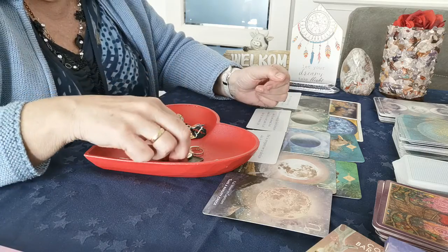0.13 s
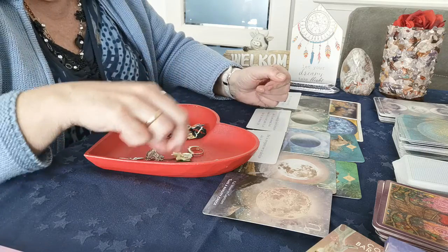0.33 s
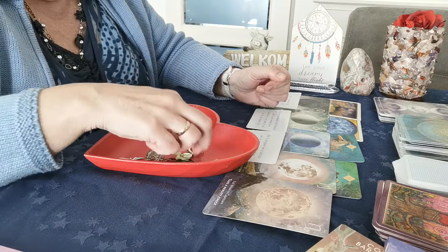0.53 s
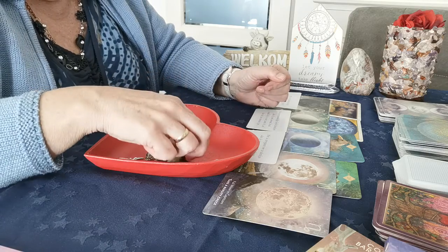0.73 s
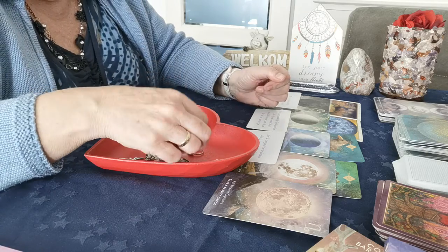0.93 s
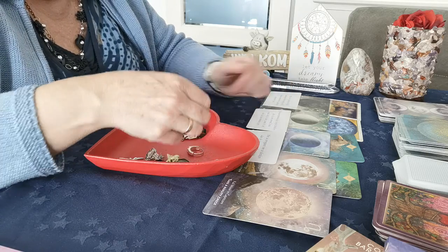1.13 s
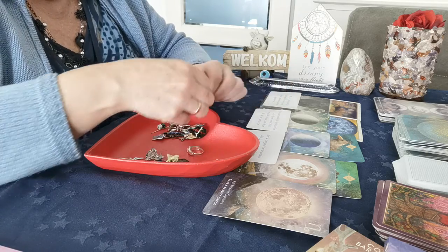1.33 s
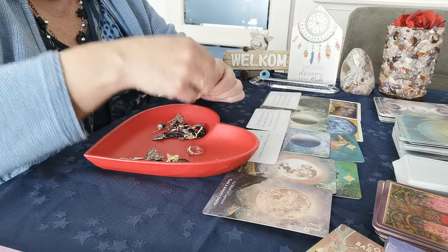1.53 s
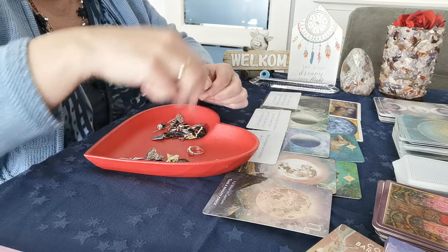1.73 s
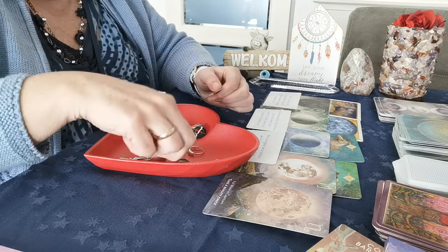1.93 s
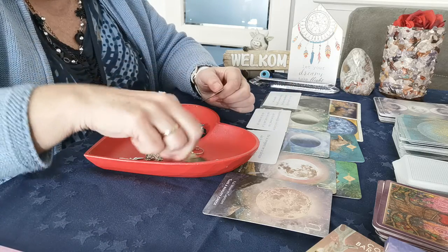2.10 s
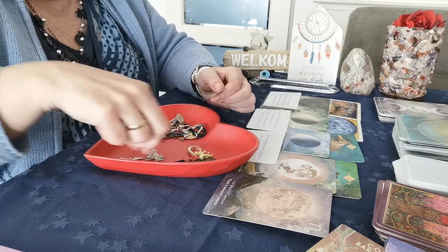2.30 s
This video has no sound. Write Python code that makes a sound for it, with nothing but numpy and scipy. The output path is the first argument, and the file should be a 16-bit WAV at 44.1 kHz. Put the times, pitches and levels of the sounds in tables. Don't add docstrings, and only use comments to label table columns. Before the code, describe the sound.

Close up in a quiet indoor room, fingers push metal trinkets around a hard plastic dish: dry knocks, skids and thin clinks, a near-silent gap with soft cloth rustle, then a sharp final rattle.

```python
import sys
import numpy as np
from scipy import signal
from scipy.fft import rfft, irfft
from scipy.io import wavfile
from scipy.ndimage import uniform_filter1d

SR = 44100
rng = np.random.default_rng(int(sys.argv[2]) if len(sys.argv) > 2 else 0)


def makeup_ratio(level_db):
    decades = np.asarray(level_db, float) / 20
    return 10 ** decades


def waveform_to_disk(signal):
    frames = np.transpose(np.atleast_2d(signal))
    scaled = np.clip(frames, -1, 1) * 32767
    samples = np.round(scaled).astype(np.int16)
    wavfile.write(sys.argv[1], SR, samples)


N = 104164

# (frequency [Hz], level [dB per Hz])
DISH_SPECTRUM = [(300, -12), (760, -13), (950, -5.5), (1400, -3), (2300, -3), (3100, -1), (3700, -1.5),
                 (8000, -26), (15000, -67)]
# (frequency [Hz], level [dB per Hz])
JINGLE_SPECTRUM = [(2500, -24), (4000, -3.5), (5000, -7), (5800, 0.5), (6500, -4.5), (7900, -0.5),
                   (10400, -21), (14800, -19), (16200, -40)]
# (frequency [Hz], level [dB], t60 [s])
CHARM_MODES = [(5730, -4, .05), (5916, -7, .06), (6630, -10, .06), (7250, -8, .06), (7800, -3, .05),
               (8050, -6, .06), (9100, -14, .06), (10190, -22, .08), (12650, -22, .07)]


def evened(x):
    return x / np.sqrt(np.mean(x ** 2) + 1e-20)


def read(points, hz):
    f, value = np.transpose(points)
    return np.interp(np.log(hz + 1), np.log(f + 1), value)


def add(mix, s, sound):
    part = mix[max(round(s * SR), 0):][:len(sound)]
    part += sound[:len(part)]


def click(points):
    hz = abs(np.fft.fftfreq(2048, 1 / SR))
    log_gain = np.log(makeup_ratio(np.maximum(read(points, hz), -100)))
    minimum_phase = np.exp(signal.hilbert(log_gain).conj())
    taps = np.fft.ifft(minimum_phase).real[:1024]
    return taps / np.linalg.norm(taps)


def resonate(x, hz, width):
    turn = np.exp(2j * np.pi * hz * np.arange(x.shape[-1]) / SR)
    r = np.exp(-np.pi * width / SR)
    return 2 * (turn * signal.lfilter([1 - r], [1, -r], x / turn)).real


def ring(hz, db, t60, size=9000):
    t = np.arange(size) / SR
    return makeup_ratio(db - 60 * t / t60) * np.sin(2 * np.pi * hz * t)


def grains(per_s, spread_db):
    hit = rng.random(N) < per_s / SR
    size = makeup_ratio(spread_db * np.minimum(rng.exponential(1, N), 3))
    x = hit * rng.choice([-1., 1.], N) * size
    return x / np.sqrt(uniform_filter1d(x ** 2, size=500) + 0.44 * np.mean(x ** 2))


def floor():
    # (frequency [Hz], level [dB per Hz])
    air_spectrum = [(12, -44), (22, -15.5), (44, -12), (77, -9.5), (301, -17), (399, -17), (718, -22.5),
                    (2750, -28), (16000, -49.5)]
    # (frequency [Hz], left-right coherence [-1 to 1])
    coherence = [(60, 0.093), (240, 0.58), (950, -0.17), (3770, 0.13), (15000, -0.15)]
    air_db, hum_db, hum_hz = -68.5, -72, 49.96
    frames, hz = N // 512 + 5, np.fft.rfftfreq(2048, 1 / SR)
    a, b, c, d = rng.standard_normal((frames, 1025, 4)).T
    same = np.clip(read(coherence, hz), -1, 1)[:, None]
    left, other = a + 1j * b, c + 1j * d
    right = same * left + np.sqrt(1 - same ** 2) * other
    z = np.array([left, right]) * makeup_ratio(read(air_spectrum, hz)[:, None])
    air = evened(signal.istft(z, nperseg=2048, noverlap=1536)[1][:, :N])
    hum = resonate(rng.standard_normal(N), hum_hz, 6.9)
    hum = evened(resonate(hum, hum_hz, 4.3))
    return makeup_ratio(air_db) * air + makeup_ratio(hum_db) * hum


def sleeve():
    # (time [s], level [dB])
    rubbing = [
        (1.26, -77.5),
        (1.5, -64),
        (1.594, -70),
        (1.938, -85),
        (1.954, -110),
        (1.983, -87),
        (2.0, -98),
    ]
    # (frequency [Hz], level [dB per Hz])
    rustle_spectrum = [(300, -29), (700, -5.5), (2400, -11.5), (8000, -18.5), (12000, -31)]
    rub_hz, width_hz, rustle_db = 284, 90, -7
    s, db = np.transpose(rubbing)
    rub = resonate(grains(405.6, 7.9), rub_hz, width_hz)
    rub = resonate(rub, rub_hz, 2 * width_hz)
    rustle = signal.oaconvolve(grains(4800, 2.2), click(rustle_spectrum))[:N]
    strength = makeup_ratio(np.interp(np.arange(N) / SR, s, db, -120, -120))
    return (evened(rub) + makeup_ratio(rustle_db) * rustle) * strength


def thuds():
    # (time [s], peak level [dB], frequency [Hz], t60 [s])
    bumps = [(0.249, -57, 126.5, 0.19), (0.304, -65.5, 368, 0.3), (0.419, -49.5, 379, 0.19),
             (0.426, -58, 121, 0.11), (0.791, -66, 120, 0.25), (1.08, -58, 120.7, 0.35),
             (1.227, -59, 121, 0.13), (2.115, -59, 409, 0.12), (2.236, -51, 246, 0.041),
             (2.29, -52.5, 135, 0.136), (2.333, -52.5, 206, 0.1)]
    rise_s = 0.0066
    out, t = np.zeros(N), np.arange(9000) / SR
    for (s, db, hz, t60), shake in zip(bumps, rng.standard_normal((20, 9000))):
        shudder = evened(resonate(shake, hz, 0.15 * hz)) * makeup_ratio(db + 5 - 60 * t / t60)
        add(out, s, (ring(hz, db, t60) + shudder * 0.38) * np.minimum(t / rise_s, 1))
    return out


def tinks():
    # (time [s], peak level [dB], frequency [Hz], t60 [s])
    ringing = [(.303, -57, 5600, 0.022), (.362, -25, 4030, 0.011), (.7525, -37.5, 2166, .035),
               (.7765, -44, 2090, 0.024), (.785, -46.5, 2103, .03), (.934, -32.5, 5854, 0.026),
               (.934, -54, 8300, 0.022), (.934, -52, 12750, 0.032), (1.226, -47, 5910, 0.1),
               (1.225, -60, 8260, 0.22), (1.228, -43.5, 1232, 0.04), (1.226, -44, 6600, 0.039),
               (1.228, -44, 1940, .03), (1.232, -44, 2740, 0.037), (1.612, -71, 2370, 0.11),
               (1.226, -60, 11200, .12), (1.226, -58, 13300, .12), (1.226, -60, 14600, .09),
               (1.055, -58, 14200, .06), (.934, -58, 10900, .07), (1.226, -52, 7400, .08),
               (.7455, -56, 2200, .02), (2.263, -35.5, 5900, 0.017), (2.263, -36, 4200, .012)]
    rise_cycles = 4.5
    out, t = np.zeros(N), np.arange(9000) / SR
    for s, db, hz, t60 in ringing:
        add(out, s, ring(hz, db, t60) * np.minimum(t * hz / rise_cycles, 1))
    return out


def stirring():
    # (time [s], effort [dB], metal share [dB])
    strokes = [
        [(0, -39.5, -11.5), (.03, -48.5, -8), (.055, -49.5, -18.5), (.1, -58.5, -15)],
        [(.234, -48, 2), (.25, -42.5, -4.5), (.268, -44.5, -9), (.285, -55.5, -18), (.35, -46, -6.5),
         (.41, -36, -10.5), (.47, -51.5, -16), (.6, -50, -18), (.64, -68, -11)],
        [(.772, -59, -10.5), (.8, -55.5, 2.5), (.84, -59.5, -10.5), (.9, -48, -9.5), (.965, -60, -8),
         (1.018, -64, -1), (1.03, -53, -8), (1.095, -51, -2), (1.17, -88, -31)],
        [(1.228, -51, -30), (1.256, -61, -2), (1.3, -80.5, 9)],
        [(2.112, -61.5, -11), (2.14, -72, -4.5), (2.205, -82, 0), (2.22, -54, -17), (2.245, -39.5, -14),
         (2.3, -44, -5.5), (2.335, -42, -6), (2.36, -52, -1.5)],
    ]
    stroke_tilts = [4, -2, 1.5, 0, -1]
    # (frequency [Hz], level [dB per Hz])
    drum_spectrum = [(60, -11), (120, 8), (370, 4), (800, 1)]
    skid_db, drum_db, clink_db, clink_ring_db = -2, -29, 5.5, -23.5
    skid_t60, spots = 0.008, 16
    t, effort, metal, tilt_db = np.arange(N) / SR, np.zeros(N), np.zeros(N), np.zeros(N)
    for rows, tilt in zip(strokes, stroke_tilts):
        s, db, rel_db = np.transpose(rows)
        edge = np.clip(np.minimum(t - s[0] + .002, s[-1] + .01 - t) / .004, 0, 1)
        effort += edge * makeup_ratio(np.interp(t, s, db))
        tilt_db += edge * tilt
        metal += edge * makeup_ratio(np.interp(t, s, db + rel_db))

    slips = effort * grains(2600, 3.5)
    spot, skids = rng.integers(0, spots, N), np.zeros(N)
    for k, hz in enumerate(np.geomspace(950, 3250, spots)):
        note = ring(hz, 0, skid_t60, size=800)
        here = slips * (spot == k) * makeup_ratio(tilt_db * np.log2(hz / 1800))
        skids += signal.oaconvolve(here, note / np.linalg.norm(note))[:N]

    clinks = metal * grains(3000, 3.5)
    which = rng.integers(0, len(CHARM_MODES), N)
    out = makeup_ratio(skid_db) * signal.oaconvolve(skids + .5 * slips, click(DISH_SPECTRUM))[:N] * .5
    out += makeup_ratio(drum_db) * signal.oaconvolve(slips, click(drum_spectrum + [(2000, -76)]))[:N]
    out += makeup_ratio(clink_db) * signal.oaconvolve(clinks, click(JINGLE_SPECTRUM))[:N]
    for k, (hz, db, t60) in enumerate(CHARM_MODES):
        mode = ring(hz, db, t60) / np.sqrt(t60 * SR / 28 / len(CHARM_MODES))
        out += makeup_ratio(clink_ring_db) * signal.oaconvolve(clinks * (which == k), mode)[:N]
    return out


def knocks():
    # (time [s], peak level [dB], dish note [Hz], metal share [dB])
    dish_knocks = [(0.0263, -31.5, 3130, -13), (0.245, -26.5, 2840, -35), (0.2627, -28, 2350, -2.5),
                   (0.303, -29.5, 2430, -2), (0.3614, -15, 2670, -13.5), (0.5247, -31.5, 2390, -17),
                   (0.5625, -33.5, 2400, -10), (0.5941, -31.5, 2210, -25), (0.753, -49, 2100, -2.5),
                   (0.776, -32, 2130, -10), (0.7851, -35, 2240, -4.5), (0.9022, -33, 3010, -7.5),
                   (0.935, -42, 2580, 8), (1.0292, -42, 2160, -32), (1.054, -34, 2490, 0),
                   (1.08, -31, 2480, -25), (1.088, -35, 3000, -23), (1.226, -36, 2000, -1),
                   (1.2354, -34, 2630, -4.5),
                   (2.115, -56, 1400, -22), (2.193, -55, 2440, 6.5), (2.217, -33.5, 2820, -12),
                   (2.223, -36, 2360, -27), (2.238, -28, 2130, -9), (2.2632, -23.5, 2470, 0.5),
                   (2.277, -21.5, 2230, -10.5), (2.287, -14, 1786, -38), (2.2952, -21, 2040, -11),
                   (2.3073, -20, 2240, -14.5), (2.316, -25, 2250, -13), (2.329, -27.5, 2330, -4),
                   (0.0048, -48, 2430, -27), (0.0132, -23, 2500, -28), (0.0359, -30, 2070, -37),
                  (0.239, -30, 2340, -7), (0.2481, -20.5, 2660, -13), (0.265, -34, 2220, -11),
                  (0.3055, -32.5, 2040, -20), (0.3273, -33.5, 2360, -4), (0.3509, -29.5, 2160, -22),
                  (0.3697, -31, 2780, -20), (0.3972, -30, 2420, -15), (0.4048, -29.5, 1700, -7.5),
                  (0.409, -26, 2200, -10), (0.4147, -33, 2270, -25), (0.4211, -28, 2420, -21),
                  (0.4398, -25.5, 1980, -10), (0.4502, -32.5, 1580, -20), (0.454, -36, 2420, -14),
                  (0.477, -34, 1720, -18), (0.4887, -38, 2230, -14), (0.5089, -39, 1870, -12),
                  (0.5348, -42, 1945, -23), (0.5681, -45, 1790, -4), (0.5833, -58, 2530, -23),
                  (0.6023, -39, 1890, -12), (0.615, -45.5, 2080, -20), (0.7936, -43, 2380, -3),
                  (0.7977, -41, 2430, 0), (0.8056, -36.5, 3320, -3), (0.8559, -42, 2500, -6),
                  (0.8707, -39, 1600, -22), (0.899, -30, 2160, -19), (0.9071, -48, 2660, -4),
                  (0.9641, -37, 2080, -7), (1.102, -51, 2690, -7), (1.1386, -40, 2530, -15),
                  (2.234, -37, 2540, -11), (2.2511, -28.5, 1720, -19), (2.2725, -27, 2380, -10),
                  (2.3035, -21.5, 2190, -25), (2.3316, -27.5, 2330, -15), (2.3529, -39, 2410, -14)]
    note_db, low_note_db, blow_db, crack_db, tick_db, ring_db = -4.5, -16, -18, -7.5, 3, -20.5
    note_t60, burst_t60, rise_s = 0.0071, 0.011, 0.00096
    low_note_hz = 1302
    out, crack, tick = np.zeros(N), click(DISH_SPECTRUM), click(JINGLE_SPECTRUM)
    t = np.arange(800) / SR
    rise = np.sin(np.pi / 2 * np.minimum(t / rise_s, 1)) ** 2
    events = dish_knocks
    for (s, db, hz, metal_db), luck in zip(events, rng.standard_normal((90, 830))):
        note = ring(hz, db + note_db, note_t60, size=800)
        low = ring(low_note_hz * (1 + 0.083 * luck[28]), db + low_note_db, 2 * note_t60, size=800)
        add(out, s, (note + low) * rise * 2)
        add(out, s + rise_s / 2, makeup_ratio(db + blow_db) * crack / abs(crack).max())

        burst = luck[30:] * makeup_ratio(-60 * t / burst_t60) * np.sqrt(rise)
        chatter, rattle = np.convolve(crack, burst), np.convolve(tick, burst)
        add(out, s, makeup_ratio(db + crack_db) * chatter / abs(chatter).max())
        add(out, s, makeup_ratio(db + metal_db + tick_db) * rattle / abs(rattle).max())

        for (f, mode_db, t60), detune, gain in zip(CHARM_MODES, luck, luck[15:]):
            mode = ring(f * (1 + .015 * detune), mode_db + 3 * gain, t60)
            add(out, s, makeup_ratio(db + metal_db + ring_db) * mode)
    return out


def room(x):
    # (frequency [Hz], t60 [s])
    decay = [(200, 0.6), (700, 0.48), (1800, 0.38), (4600, 0.53), (10000, 0.22)]
    room_db = -5
    taps = np.zeros((2, SR // 2))
    at = np.arange(120, SR // 2 - 20, 20)
    at = at + rng.integers(0, 20, (2, len(at)))
    np.put_along_axis(taps, at, rng.choice([-1., 1.], at.shape), 1)
    hz, t, z = signal.stft(taps, SR, nperseg=256)
    z = z * makeup_ratio(-60 * t / read(decay, hz)[:, None])
    tail = signal.istft(z, SR, nperseg=256)[1]
    tail = makeup_ratio(room_db) * tail / np.linalg.norm(tail[0])
    return signal.fftconvolve(x[None], tail, axes=1)[:, :N]


def near(x):
    near_db, edge_hz, turns_per_s = -4, 3000, 9
    t, out = np.arange(N) / SR, np.zeros(N)
    paths = rng.standard_normal((3, 60)) * makeup_ratio(-np.arange(60) / 4)
    for k, path in enumerate(paths):
        swing = np.cos(np.pi * (turns_per_s * t + k / 3))
        out += signal.oaconvolve(x * swing, path / np.linalg.norm(path))[:N]
    edge = signal.butter(1, edge_hz, "high", fs=SR, output="sos")
    return makeup_ratio(near_db) * signal.sosfilt(edge, out) * np.array([[1], [-1]])


def scene():
    dish_edge_hz, left_leads_s, pan_db = 800, 1.5e-5, -0.06
    edge = signal.butter(3, dish_edge_hz, "high", fs=SR, output="sos")
    dish = signal.sosfilt(edge, knocks() + tinks()) + stirring() + thuds() + sleeve()
    delay = np.exp(-2j * np.pi * np.fft.rfftfreq(N, 1 / SR) * left_leads_s)
    late = irfft(rfft(dish) * delay, N)
    direct = np.array([dish * makeup_ratio(pan_db), late * makeup_ratio(-pan_db)])
    return direct + floor() + room(dish) + near(dish)


def low_pass(x):
    return signal.sosfilt(signal.butter(12, 16400, fs=SR, output="sos"), x)


def record(dry):
    mic_edge_hz = 15700
    edge = signal.firwin(101, mic_edge_hz, window=("kaiser", 5), fs=SR)
    mix = signal.oaconvolve(dry, edge[None], "same")
    return low_pass(mix)


dry = scene()
out = record(dry)
waveform_to_disk(out)
```